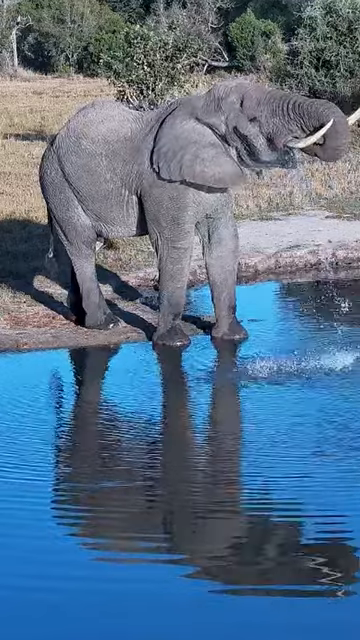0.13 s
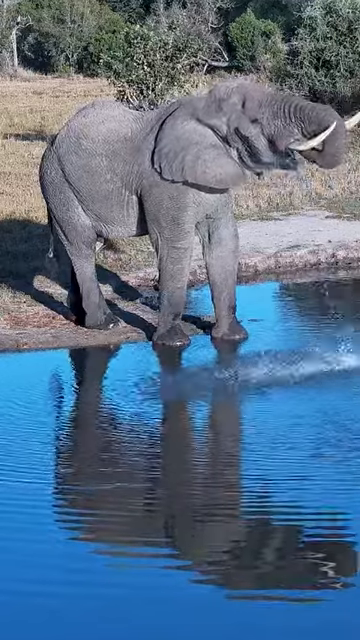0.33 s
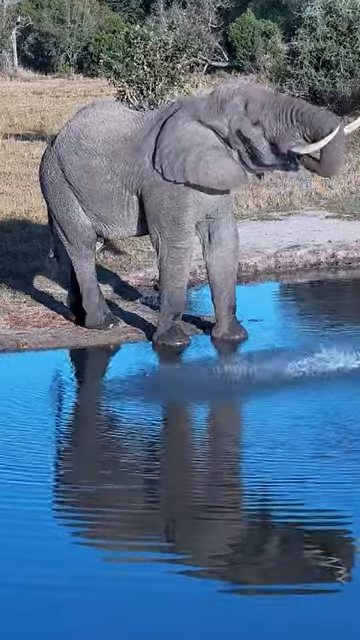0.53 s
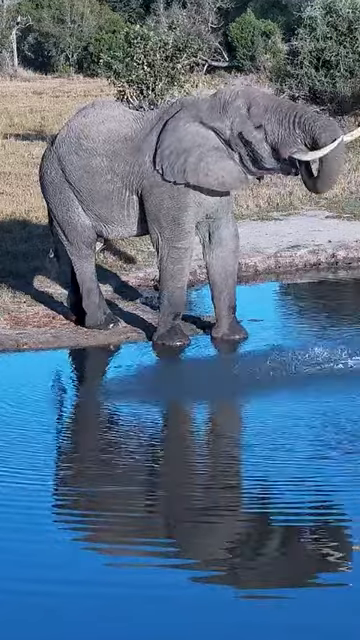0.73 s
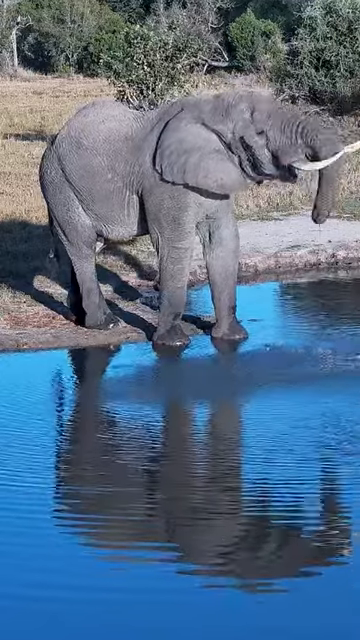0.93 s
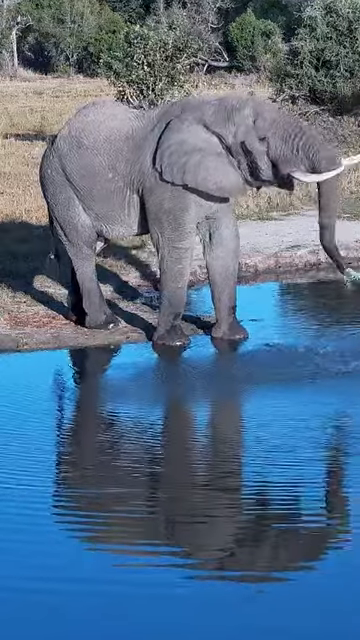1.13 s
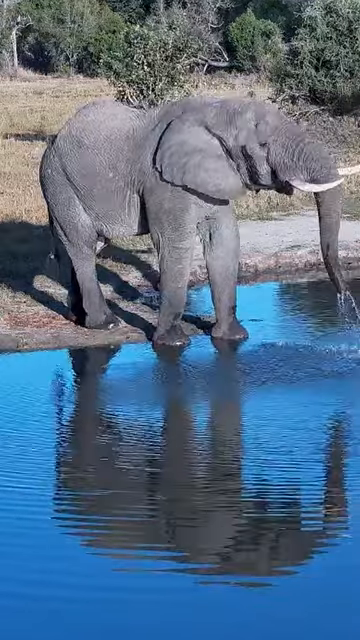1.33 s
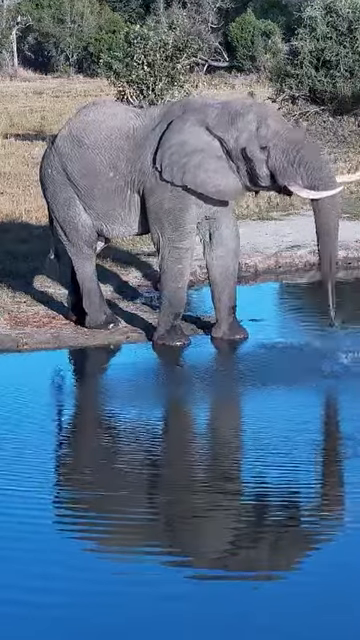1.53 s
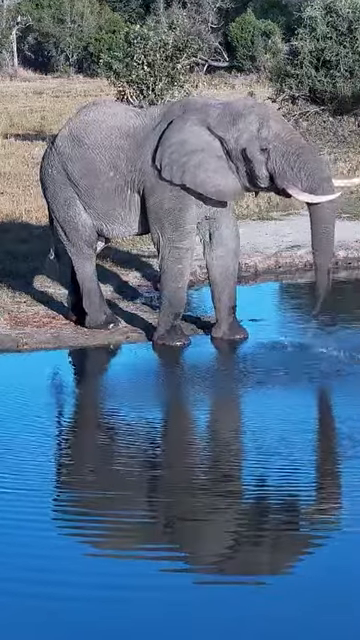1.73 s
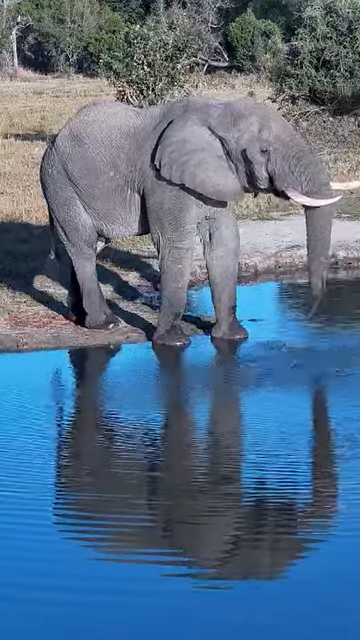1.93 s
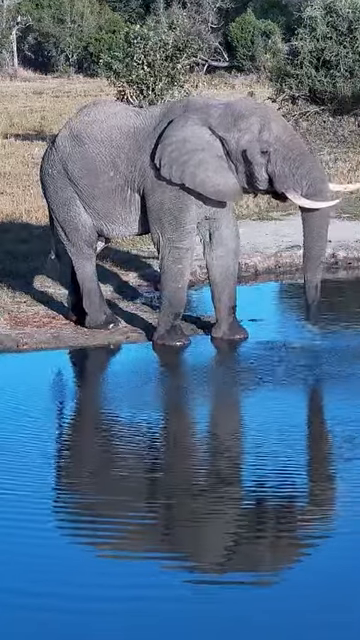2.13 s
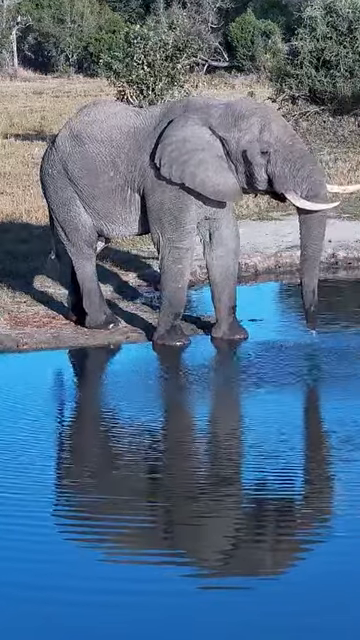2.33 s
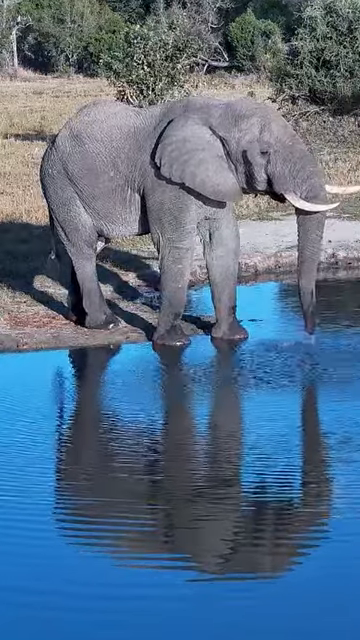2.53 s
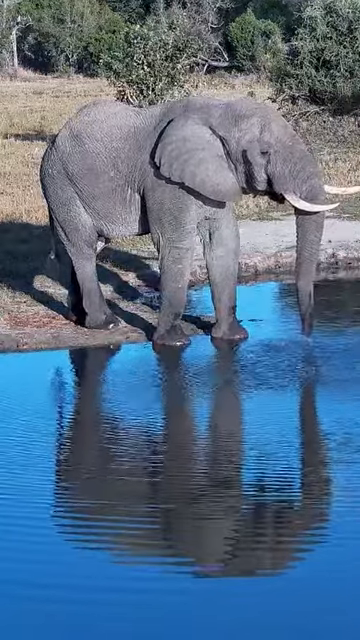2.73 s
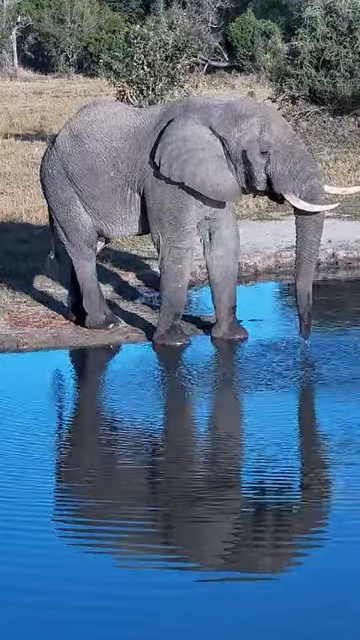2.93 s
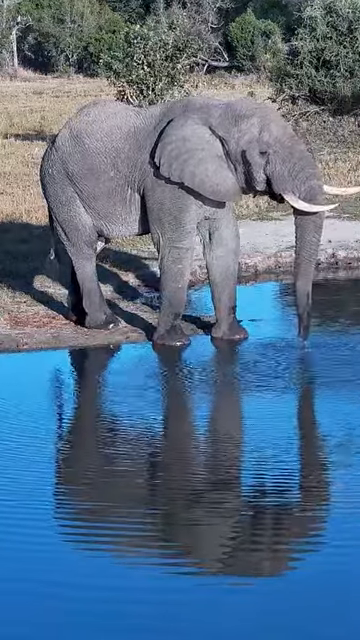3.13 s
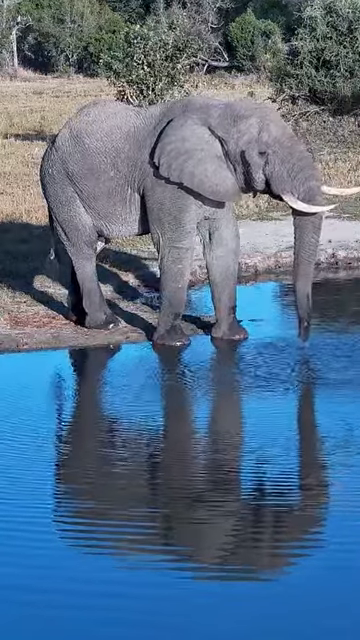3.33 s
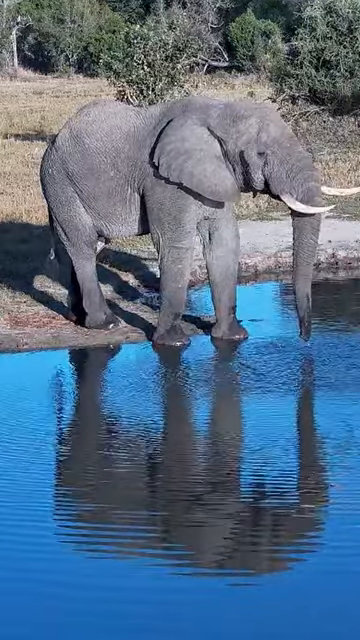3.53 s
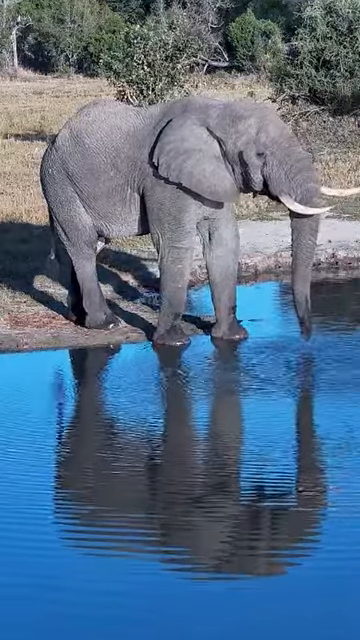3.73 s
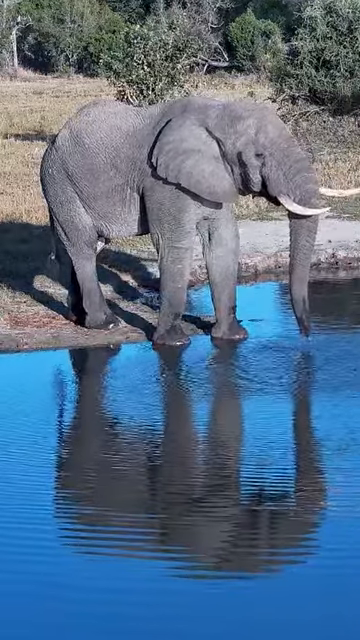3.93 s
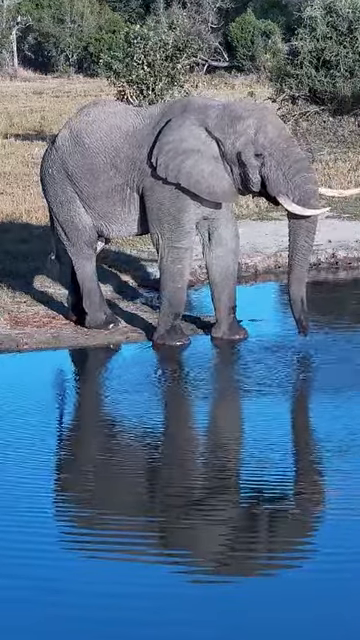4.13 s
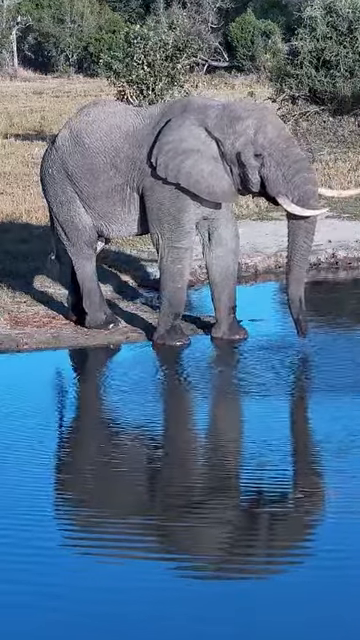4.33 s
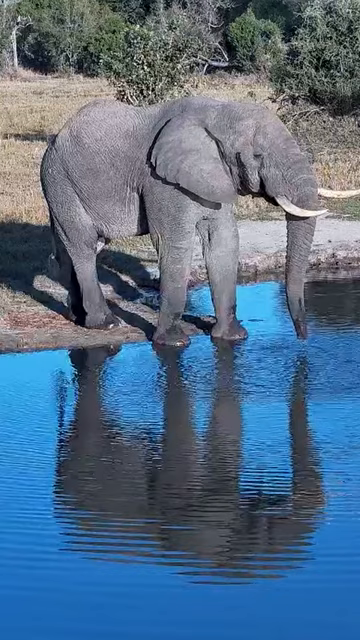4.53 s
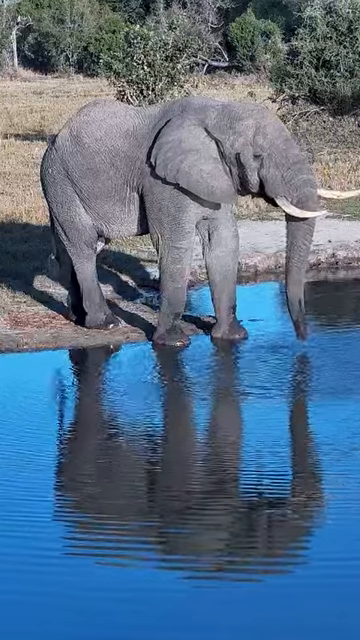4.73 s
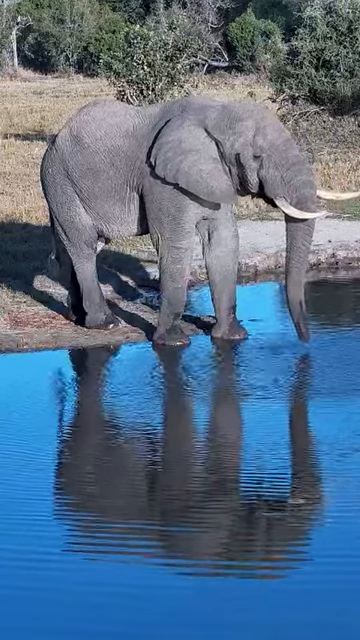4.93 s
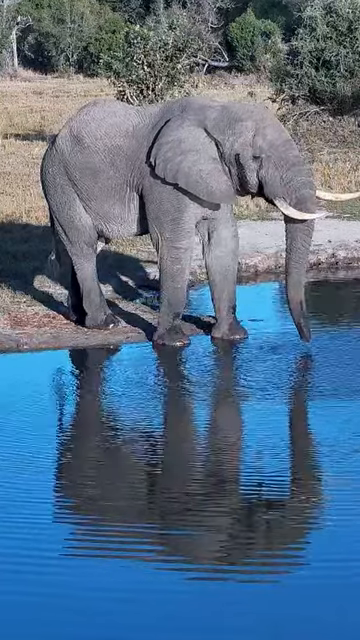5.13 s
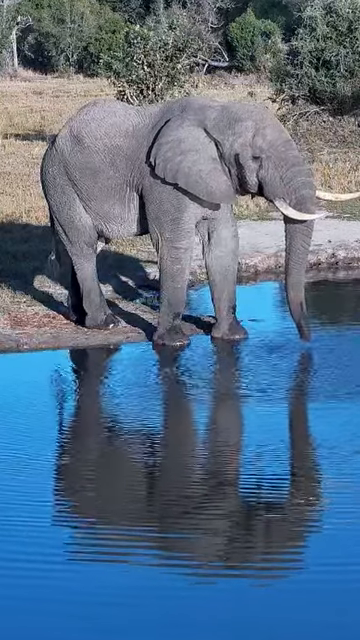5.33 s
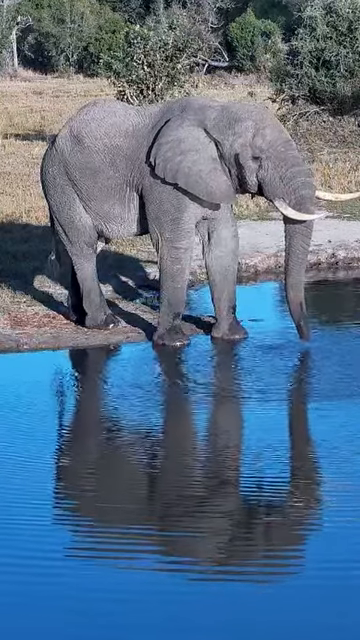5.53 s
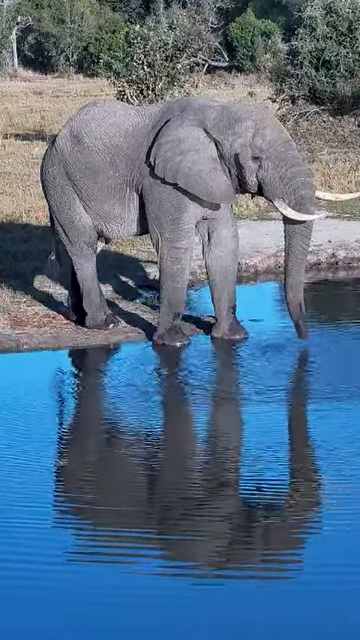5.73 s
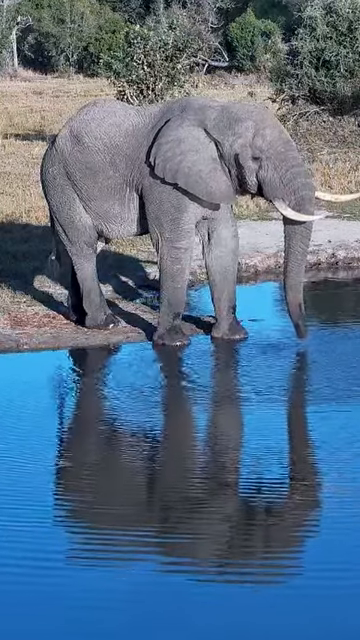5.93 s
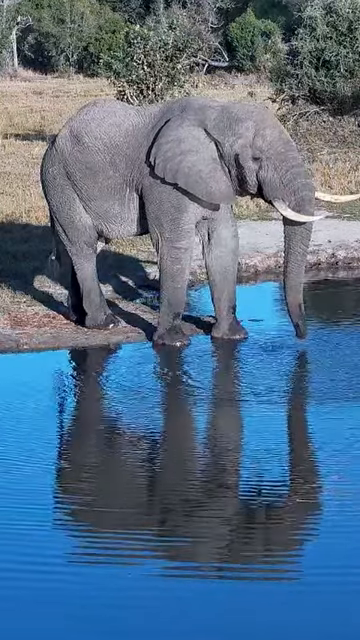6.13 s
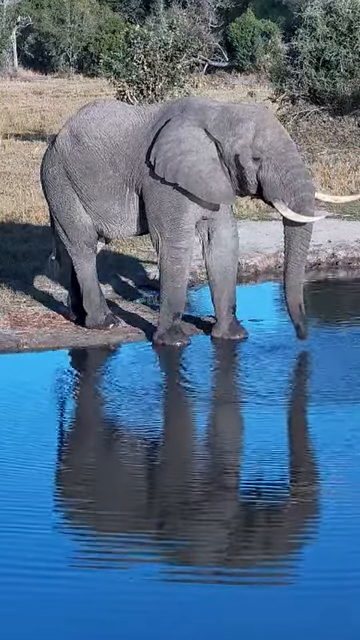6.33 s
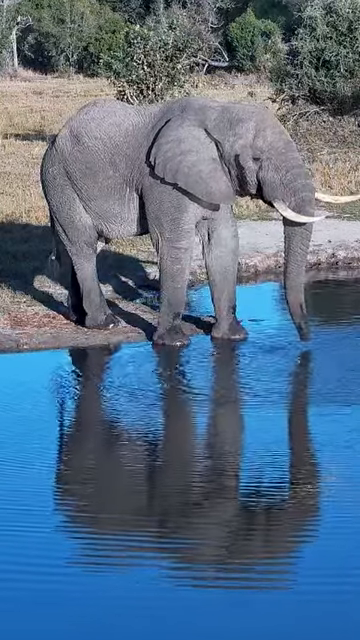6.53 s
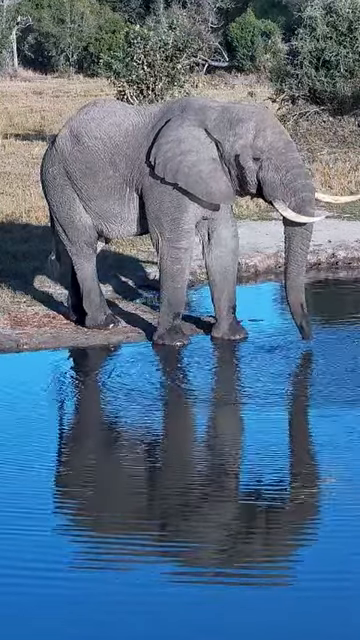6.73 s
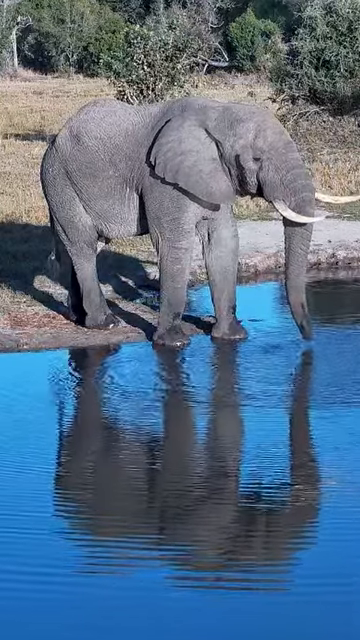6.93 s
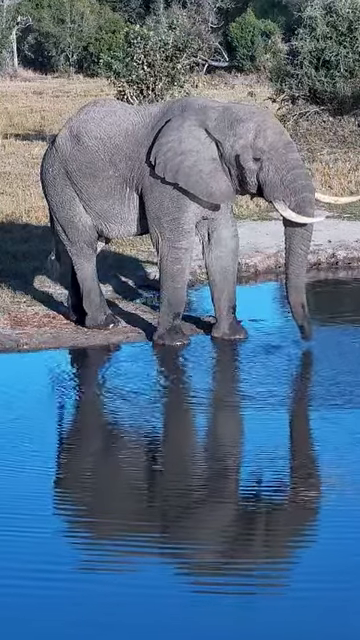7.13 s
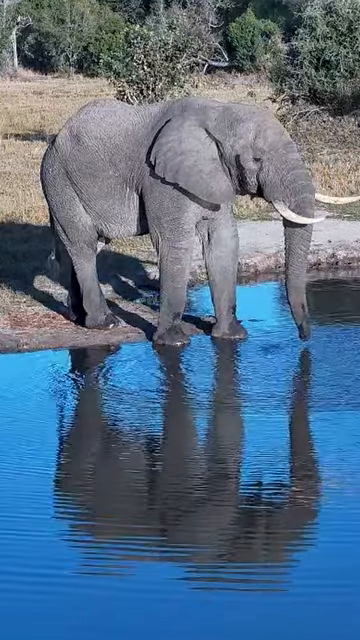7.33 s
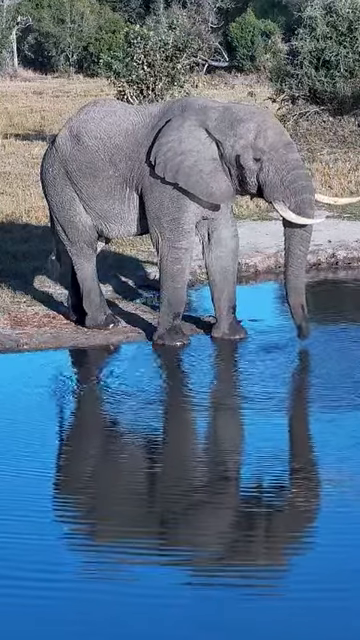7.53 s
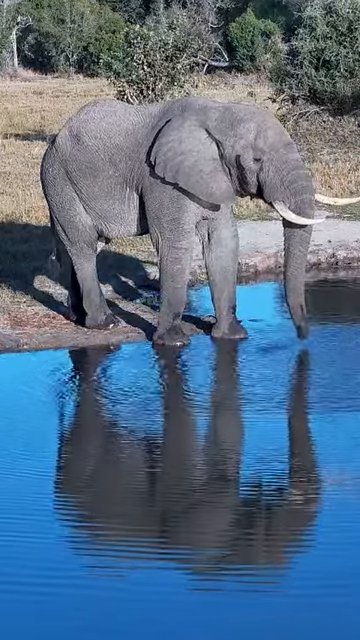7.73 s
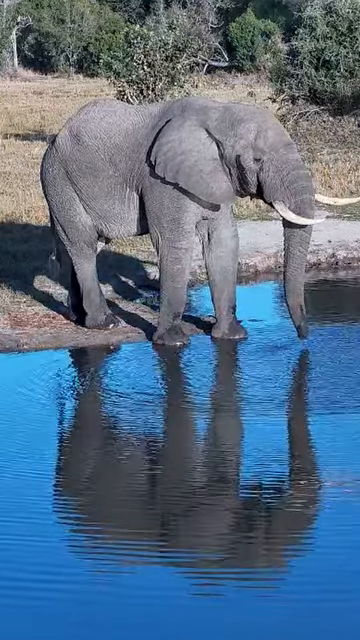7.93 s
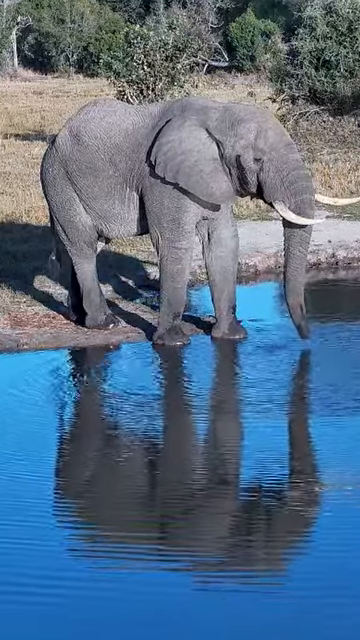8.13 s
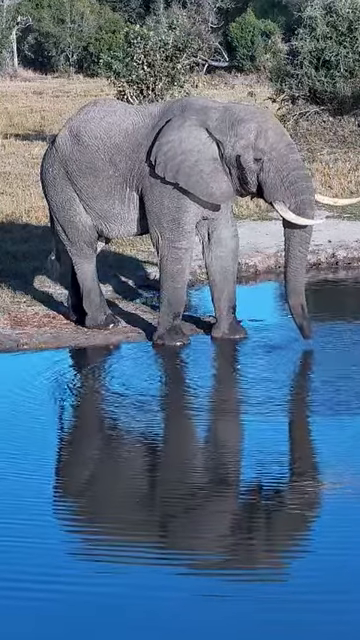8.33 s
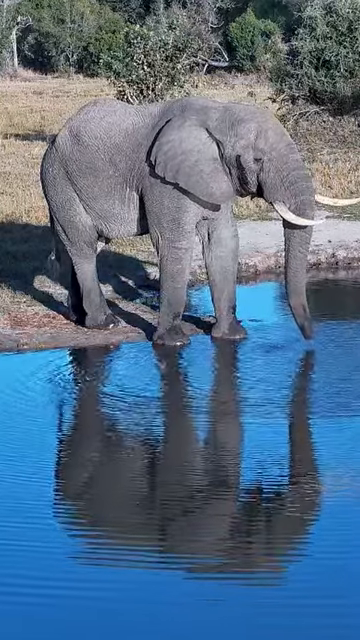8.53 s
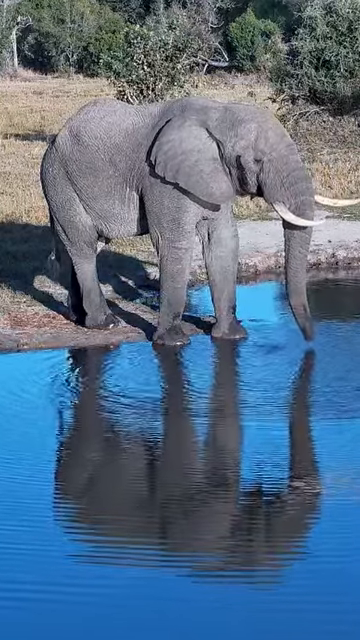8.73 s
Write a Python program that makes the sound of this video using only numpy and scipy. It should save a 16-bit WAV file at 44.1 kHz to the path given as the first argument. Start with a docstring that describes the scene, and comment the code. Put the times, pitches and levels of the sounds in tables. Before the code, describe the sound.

Outdoors at a waterhole, bubbling water opens the scene and breaks into crisp, wet slaps. It quickly dies to scattered plinks, gurgles and a spattering trickle, plus a tiny spray burst. A harsh, whistling bird call comes early over the dripping; a thin stream hisses faintly, then near-quiet settles. A softer raspy bird phrase follows late. Steady soft air rush, clear nearby water, short diffuse echo.

```python
"""An elephant drinks at a waterhole, while faint outdoor air and softly echoing bushes surround it.
First, water pours and slaps onto the pond: clouds of tiny ringing bubbles, hiss and struck cavities.
Then the trunk drips, trickles and glugs, and squirts once: damped tones, rising tones and spray.
A bird calls in two short phrases: harmonic whines, hoarse notes and pulsed rattles, with two whistles
and a dry snap in the first phrase only. Between the phrases, a thin stream hisses for a moment."""
import sys
import numpy as np
from scipy import signal
from scipy.fft import rfft, irfft, next_fast_len
from scipy.io import wavfile
from scipy.ndimage import map_coordinates

SR = 44100
rng = np.random.default_rng(int(sys.argv[2]) if len(sys.argv) > 2 else 0)


def file_out(sig):
    """Save sig as 16-bit WAV at sys.argv[1]."""
    # one column per channel
    cols = np.atleast_2d(sig).T
    # limit, then scale
    lim = np.clip(cols, -1, 1)
    pcm = np.round(lim * 32767).astype(np.int16)
    wavfile.write(sys.argv[1], SR, pcm)


N = 392490  # length in samples


def amp(db):
    """Turn decibels into a plain gain."""
    return 10 ** (np.asarray(db) / 20)


def unit(x):
    """Scale a sound to an rms of 1."""
    return x / np.sqrt(np.mean(x ** 2) + 1e-20)


def along(points, hz):
    """Read a curve of (pitch_hz, value) points, joined by lines on a log pitch axis."""
    point_hz, value = np.transpose(points)
    return np.interp(np.log(hz + 1), np.log(point_hz + 1), value)


def wobble(rate, size):
    """A smooth random curve with `rate` random points a second."""
    points = rng.standard_normal(int(size * rate / SR) + 4)
    return map_coordinates(points, [np.arange(size) * rate / SR])


def swell(start, hold, rise, fall, size=N):
    """A gain that climbs to 1 by `start`, holds, then falls; times in s, slopes in dB per s."""
    t = np.arange(size) / SR - start
    climbing_db = -abs(rise) * np.maximum(-t, 0)
    falling_db = -abs(fall) * np.maximum(t - hold, 0)
    return amp(climbing_db + falling_db)


def glide(t, middle, width):
    """A smooth step from 0 to 1."""
    return .5 + .5 * np.tanh((t - middle) / (2 * width))


def filtered(x, response):
    """Multiply the spectrum of x by a response, given as a function of frequency."""
    padded = next_fast_len(N + SR // 2)
    hz = np.fft.rfftfreq(padded, 1 / SR)
    return irfft(rfft(x, padded) * response(hz), padded)[:N]


def coloured(x, spectrum):
    """Filter x by a table of levels over frequency, then scale it to an rms of 1."""
    return unit(filtered(x, lambda hz: amp(along(spectrum, hz))))


def narrow_noise(centre, width):
    """Noise around one frequency, at rms 1; at the edges of `width` the filter gain is half."""
    noise = rng.standard_normal(N)
    return unit(filtered(noise, lambda hz: 1 / (1 + ((hz - centre) / width * 2) ** 2)))


def add(track, s, sound):
    """Mix a sound into the track at time s."""
    part = track[max(round(s * SR), 0):][:len(sound)]
    part += sound[:len(part)]


def droplets(rate, low_hz, high_hz, cycles, spread_db, hiss):
    """A cloud of tiny damped bubbles of mixed pitch and strength, over the hiss of countless finer ones."""
    when, pitch, size = rng.random((int(rate * N / SR), 3)).T[:, :, None]
    hz = low_hz * (high_hz / low_hz) ** pitch
    k = np.arange(SR // 100)
    turns = hz * k / SR
    # a smaller bubble rings higher and dies sooner
    decay = np.exp(-turns / cycles) * (1 - k / len(k))
    ring = np.sin(2 * np.pi * turns) * decay
    strength = hz * amp(-spread_db * np.log(np.maximum(size, .02)))
    positions = (when * N).astype(int) + k
    cloud = np.bincount(positions.ravel(), (strength * ring).ravel(), N)[:N]
    return unit(cloud) + hiss * rng.standard_normal(N)


def impacts(rows, cycles, splash, splash_t60, width):
    """Each hit rings a short-lived cavity and throws a puff of spray around the same pitch."""
    out, t = np.zeros(N), np.arange(SR // 20) / SR
    f = np.fft.rfftfreq(len(t), 1 / SR)
    for s, db, hz in rows:
        envelope = np.exp(-hz * t / cycles) * (1 - np.exp(-2 * hz * t))
        cavity = np.sin(2 * np.pi * hz * t) * envelope
        band = np.exp(-(np.log2((f + 1) / hz) / width) ** 2)
        spray = unit(irfft(rfft(rng.standard_normal(len(t))) * band, len(t)))
        fading_spray = spray * amp(-60 * t / splash_t60)
        add(out, s, amp(db) * (cavity + splash * fading_spray))
    return out


# tone of the outdoor air: pitch_hz, relative level_db
AIR_TONE = [(25, -6), (60, -7.5), (150, -11.5), (300, -15.5), (430, -14.5), (560, -11), (700, -7),
            (950, -10), (1400, -7.5), (2000, -12), (2700, -14.5), (4400, -15), (12000, -15)]
# narrow humps in the air's rush: centre_hz, width_hz, average rms level_db
AIR_HUMPS = [(600, 224, -66.5), (1172, 49, -65), (1630, 95, -67.5), (3350, 1050, -63)]


def air(floor_db=-54.0, waver_db=1.5):
    """Steady filtered noise makes the outdoor rush, with narrow noise humps that waver in level."""
    out = amp(floor_db) * coloured(rng.standard_normal(N), AIR_TONE)
    for centre, width, db in AIR_HUMPS:
        out += amp(db + waver_db * wobble(3.34, N)) * narrow_noise(centre, width)
    return out


# tone of the bubbles under the pour: pitch_hz, relative level_db
BUBBLING_TONE = [(100, -49), (220, -13.5), (310, -7), (460, -9), (540, -5), (620, 2.5), (690, -2),
                 (770, -11), (860, -3), (1080, -8), (1250, -3.5), (1510, -2.5), (1750, -13), (2500, -15),
                 (4000, -42)]
# tone of spattering water, for the shower and the trickle: pitch_hz, relative level_db
SPATTER_TONE = [(900, -28), (1800, -5), (2650, -13), (3050, -4.5), (3300, 0), (3800, -5), (4200, -12.5),
                (4800, -10.5), (5600, -22.5), (6500, -18.5), (8000, -24.5), (12000, -41)]
# tone of the fine mist: pitch_hz, relative level_db
MIST_TONE = [(2000, -27), (3300, -2), (4700, 1.5), (5700, -5), (6600, -9), (9000, -14.5), (12000, -25)]
# gouts of water hitting the pond, for the shower and the slaps: start_s, length_s, level_db, pitch_hz
WATER_GOUTS = [(0.512, 0.009, -16, 3200), (0.54, 0.0053, -10.5, 3120), (0.593, .006, -14, 3130),
               (0.596, .009, -10.5, 3240), (0.615, .004, -13, 3900), (0.6545, 0.0051, -12, 2800),
               (0.668, 0.014, -15, 3330), (0.737, 0.018, -14, 3150), (0.763, .009, -10.5, 3350),
               (0.7776, .005, -9.5, 3830), (.7934, .009, -14, 3150), (0.882, 0.022, -13.5, 3280),
               (0.984, .005, -19, 3470), (1.116, 0.03, -24.5, 1400)]
# water pouring from the mouth: steady, then it thins out
POUR_END_S, POUR_FALL_DB_PER_S, POUR_BUBBLING_DB, POUR_SPATTER_DB = 0.9, 51.5, -33.5, -39
# the bulk of the spill comes down as one broad splash, at full strength from SPLASH_S
SPLASH_S, SPLASH_HOLD_S, SPLASH_DB = 0.51, 0.5, -34.5
SPLASH_RISE_DB_PER_S, SPLASH_FALL_DB_PER_S = 160, 73
# spatter of each gout; its level is relative to the gout's level_db
GOUT_SPATTER_DB, GOUT_RISE_DB_PER_S, GOUT_FALL_DB_PER_S = -18.5, 2500, 452


def shower(mist_db=-16, clump_db=1.6, clumps_per_s=90):
    """Spilled water churns up bubbles; the pour, the splash and each gout throw spatter and fine mist."""
    pour = swell(0, POUR_END_S, 0, POUR_FALL_DB_PER_S)
    splash = swell(SPLASH_S, SPLASH_HOLD_S, SPLASH_RISE_DB_PER_S, SPLASH_FALL_DB_PER_S)
    clumpy_splash = amp(SPLASH_DB + clump_db * wobble(clumps_per_s, N)) * splash
    flows = [amp(POUR_SPATTER_DB) * pour, clumpy_splash]
    for s, length, db, _ in WATER_GOUTS:
        burst = swell(s, length, GOUT_RISE_DB_PER_S, GOUT_FALL_DB_PER_S)
        flows.append(amp(db + GOUT_SPATTER_DB) * burst)
    spatter_gain = np.linalg.norm(flows, axis=0)  # the flows add in power

    bubbles = droplets(rate=1500, low_hz=300, high_hz=2800, cycles=16, spread_db=1.0, hiss=1.4)
    drops = droplets(rate=1400, low_hz=1770, high_hz=6770, cycles=3.7, spread_db=2.5, hiss=1.0)
    bubbling = coloured(bubbles, BUBBLING_TONE)
    spatter = coloured(drops, SPATTER_TONE)
    mist = coloured(rng.standard_normal(N), MIST_TONE)
    return amp(POUR_BUBBLING_DB) * pour * bubbling + spatter_gain * (spatter + amp(mist_db) * mist)


SLAP_GAP_S = .0062
GOUT_FADE_DB = 11  # drop in slap level over one gout length


def slaps(count=4, uneven=.12, pitch_spread=0.045):
    """Each gout breaks into a quick run of fading slaps, each a struck cavity with spray."""
    rows = []
    for s, length, db, hz in WATER_GOUTS:
        for k, (late, detune) in enumerate(rng.standard_normal((count, 2))):
            # the first slap is always on time
            delay = SLAP_GAP_S * (k + uneven * late * (k > 0))
            level_db = db - GOUT_FADE_DB * (delay / length) ** 2
            rows.append((s + delay, level_db, hz * np.exp(pitch_spread * detune)))
    return impacts(rows, cycles=3.5, splash=0.2, splash_t60=0.016, width=0.83)


# tone of the gurgling run-off: pitch_hz, relative level_db
GURGLE_TONE = [(200, -24), (400, -4.5), (580, -4), (800, 0.5), (980, -3.5), (1220, 3.5), (1420, -1),
               (1620, 2.5), (2000, -10.5), (2600, -7), (4000, -24)]
# dribbles that swell the run-off: peak_time_s, bubbling level_db, spatter level_db
RUNOFF_DRIBBLES = [(1.36, -52, -50), (2.0, -51.5, -46.5), (2.13, -53, -46.5), (2.4, -71, -49),
                   (2.71, -51.5, -47), (3.03, -49, -45), (3.55, -53, -49.5), (3.98, -54, -56.5),
                   (4.42, -55.5, -56)]
DRIBBLE_RISE_DB_PER_S, DRIBBLE_FALL_DB_PER_S = 56, 44
# run-off from trunk and chin: starting levels and how fast each part dries up
RUNOFF_START_S, RUNOFF_END_S = 1.2, 7.74
RUNOFF_BUBBLING_DB, BUBBLING_DRYING_DB_PER_S = -55.5, 1.2
RUNOFF_SPATTER_DB, SPATTER_DRYING_DB_PER_S = -49.5, 2.14


def trickle(onset_db_per_s=200, stop_db_per_s=30):
    """Thin streams of ringing bubbles patter into the pond, swell with each dribble and slowly dry up."""
    running = swell(RUNOFF_START_S, RUNOFF_END_S - RUNOFF_START_S, onset_db_per_s, stop_db_per_s)
    times, bubbling_db, spatter_db = np.transpose(RUNOFF_DRIBBLES)
    surges = np.array([swell(s, 0, DRIBBLE_RISE_DB_PER_S, DRIBBLE_FALL_DB_PER_S) for s in times])

    def flow(start_db, drying, dribble_db):
        """The drying stream and its dribbles add in power."""
        stream = amp(start_db) * running * swell(RUNOFF_START_S, 0, 0, drying)
        return np.sqrt(stream ** 2 + amp(dribble_db) ** 2 @ surges ** 2)

    bubbles = droplets(rate=420, low_hz=454, high_hz=2800, cycles=6.5, spread_db=2.5, hiss=0.93)
    drops = droplets(rate=800, low_hz=2020, high_hz=7030, cycles=7.0, spread_db=2.5, hiss=1.04)
    bubbling = coloured(bubbles, GURGLE_TONE)
    spatter = coloured(drops, SPATTER_TONE)
    bubbling_gain = flow(RUNOFF_BUBBLING_DB, BUBBLING_DRYING_DB_PER_S, bubbling_db)
    spatter_gain = flow(RUNOFF_SPATTER_DB, SPATTER_DRYING_DB_PER_S, spatter_db)
    return bubbling_gain * bubbling + spatter_gain * spatter


# single drops: start_s, level_db, pitch_hz
SINGLE_DROPS = [(1.2341, -26.5, 1610), (1.3467, -28.5, 3430), (1.4082, -31, 2905), (1.4531, -33, 3900),
                (1.582, -32, 3350), (1.6228, -28.5, 3660), (1.941, -25, 3210), (1.9709, -25, 3320),
                (2.1161, -28, 3310), (2.1848, -28, 3150), (2.2313, -32, 3480), (2.6483, -37.5, 1130),
                (3.0046, -26.5, 3350), (3.0114, -29, 3470), (3.043, -30, 1630), (3.059, -31, 3280),
                (3.0762, -30, 1880), (3.239, -33, 3250), (3.5922, -32, 3380), (3.686, -31.5, 1670),
                (3.9403, -32, 1630), (3.9521, -33, 1250), (4.116, -34, 3640), (4.8753, -34, 3350),
                (5.8614, -37.5, 3270), (6.7526, -32.5, 1300), (7.1102, -32.5, 1620)]


def drips():
    """Each drop rings a short-lived cavity in the water and throws a little spray."""
    return impacts(SINGLE_DROPS, cycles=4.6, splash=0.26, splash_t60=0.029, width=0.72)


# large bubbles at the trunk tip: start_s, starting pitch_hz, level_db, life_s
BIG_BUBBLES = [(1.47, 392, -47.5, 0.029), (1.691, 800, -41.5, .034), (2.2, 934, -43.5, 0.026),
               (2.229, 1640, -33, 0.01), (2.672, 676, -39.5, .019), (2.684, 950, -41, 0.02),
               (2.925, 588, -43.5, 0.035), (2.988, 850, -38.5, 0.03), (3.042, 1535, -34.5, 0.028),
               (3.122, 990, -40, .03), (3.682, 1250, -40, .012), (3.939, 1560, -37, 0.0067),
               (3.975, 1050, -46, 0.017), (5.294, 1710, -42, .017), (5.65, 894, -48, 0.021),
               (5.72, 1360, -47, .013), (6.752, 1135, -42, .015), (8.35, 570, -44, 0.011)]


def glugs(rise=24, waver=0.038):
    """A big bubble climbs in pitch as it nears the surface; `rise` is a share of its pitch per second."""
    out = np.zeros(N)
    for s, hz, db, life in BIG_BUBBLES:
        t = np.arange(0, life, 1 / SR)
        pitch = hz * (1 + rise * t + waver * wobble(580, len(t)))
        phase = 2 * np.pi * np.cumsum(pitch) / SR
        envelope = np.sin(np.pi * t / life) * np.exp(-t / life)
        add(out, s, amp(db) * np.sin(phase) * envelope)
    return out


# tone of the trunk's jet: pitch_hz, relative level_db
JET_TONE = [(250, -43), (460, -35), (800, -12.5), (1000, -15), (1250, -5), (1700, -8), (2400, -11.5),
            (3300, 0), (4600, -11), (5700, -20.5), (6700, -18.5), (9000, -23), (12000, -30)]
# the trunk clears itself, at full strength from SQUIRT_S
SQUIRT_S, SQUIRT_HOLD_S, SQUIRT_DB = 1.844, 0.062, -33.7
SQUIRT_RISE_DB_PER_S, SQUIRT_FALL_DB_PER_S = 310, 89


def squirt():
    """A short, dense jet of fine spray leaves the trunk as a cloud of ringing drops and hiss."""
    spray = droplets(rate=1400, low_hz=800, high_hz=7100, cycles=3.9, spread_db=1.2, hiss=1.0)
    burst = swell(SQUIRT_S, SQUIRT_HOLD_S, SQUIRT_RISE_DB_PER_S, SQUIRT_FALL_DB_PER_S)
    return amp(SQUIRT_DB) * burst * coloured(spray, JET_TONE)


def bird_voice(t, hz, gain, throat_hz, skirt_db, rough,
               jitter=0.057, flutter_db=4, rasp=1.0, beak_hz=4600):
    """Six harmonics shaped by one throat resonance; rough notes shake in pitch and level."""
    k = np.arange(1, 7)[:, None]

    def shake(rate):
        """A random wobble as long as the note."""
        return wobble(rate, SR // 4)[:len(t)]

    phase = 2 * np.pi * np.cumsum(hz * (1 + jitter * rough * shake(910))) / SR
    # the beak lets only a trace of treble through, and the fourth harmonic is weak
    beak = 0.078 + 1 / np.sqrt(1 + (k * hz / beak_hz) ** 24)
    octaves_off = np.abs(np.log2(k * hz / throat_hz))
    gains = amp(-skirt_db * octaves_off - 4.1 * (k == 4)) * beak
    # turbulence frays each harmonic on its own
    fray = rasp * rough * np.array([shake(1100) for _ in k])
    harmonics = np.sum(gains * np.sin(k * phase + fray), axis=0)
    voice = np.sqrt(2) * harmonics / np.linalg.norm(gains, axis=0)
    flutter = amp(flutter_db * rough * shake(338))
    return voice * gain * flutter * signal.windows.tukey(len(t), .1)


# nasal whines that sag as the throat closes: start_s, length_s, starting pitch_hz,
# sag (share of pitch), starting level_db, closed throat_hz, throat skirts_db_per_octave
NASAL_WHINES = [(2.222, 0.111, 888, .055, -42.5, 3500, 5.5), (7.403, 0.1, 860, 0.1, -44.5, 1590, 13)]
# times count from the start of each whine
WHINE_SAG_S, WHINE_FADE_DB_PER_S, OPEN_THROAT_HZ, THROAT_CLOSE_S = 0.0395, 65, 4220, 0.019


def bird_whines(rough=.08, sag_width_s=0.0092, close_width_s=0.0044):
    """A whine starts bright and loud, then sags, dulls and fades as its throat resonance drops."""
    out = np.zeros(N)
    for s, length, hz, sag, db, closed_hz, skirt_db in NASAL_WHINES:
        t = np.arange(0, length, 1 / SR)
        pitch = hz * (1 - sag * glide(t, WHINE_SAG_S, sag_width_s))
        closing = glide(t, THROAT_CLOSE_S, close_width_s)
        throat_hz = OPEN_THROAT_HZ * (closed_hz / OPEN_THROAT_HZ) ** closing
        gain = amp(db - WHINE_FADE_DB_PER_S * t)
        add(out, s, bird_voice(t, pitch, gain, throat_hz, skirt_db, rough))
    return out


# hoarse notes: start_s, length_s, pitch_hz, starting level_db, swell_db_per_s, throat_hz,
# throat skirts_db_per_octave, roughness (0-1)
HOARSE_NOTES = [(2.362, 0.054, 1286, -49, -130, 1300, 1, .5), (2.466, 0.082, 1860, -49, 120, 3700, 7, 0.92),
                (2.556, 0.023, 1637, -29, -550, 3400, 26, 0.4),
                (2.712, 0.098, 1846, -43.5, -40, 3600, 4, 1),
                (7.315, 0.037, 1790, -51.5, -100, 3550, 21, .65), (7.524, .105, 1313, -57, 0, 1300, 5, 0.6),
                (7.64, 0.093, 1718, -52.5, 58, 2200, 7, 0.98),
                (7.738, 0.028, 1123, -40.5, -400, 3100, 17, 0.58)]


def bird_rasps():
    """A hoarse note shakes around one pitch while its level swells, fades or holds."""
    out = np.zeros(N)
    for s, length, hz, db, slope, throat_hz, skirt_db, rough in HOARSE_NOTES:
        t = np.arange(0, length, 1 / SR)
        add(out, s, bird_voice(t, hz, amp(db + slope * t), throat_hz, skirt_db, rough))
    return out


# rattles: centre of first pulse_s, pulse count, gap_s, second-harmonic pitch_hz,
# first pulse level_db, change_db per pulse
RATTLE_RUNS = [(2.4775, 6, .0108, 3620, -27, 0.8), (2.557, 2, .004, 3960, -26, -5),
               (2.75, 3, .0047, 3570, -16.5, -1.5), (2.779, 2, .005, 3770, -19, -1),
               (2.7985, 2, .004, 3670, -19.5, -5), (7.688, 3, .0115, 3280, -33, -1)]


def bird_rattle(length=.008, lower_db=-15, jitter=0.068):
    """The voice breaks into runs of brief pulses, strongest on its second harmonic."""
    out, window = np.zeros(N), np.hanning(int(length * SR))
    for s, count, gap, hz, db, step_db in RATTLE_RUNS:
        for k in range(round(count)):
            pitch = hz * (1 + jitter * wobble(1180, len(window)))
            phase = 2 * np.pi * np.cumsum(pitch) / SR
            tone = np.sin(phase) + amp(lower_db) * np.sin(phase / 2)
            add(out, s + k * gap - length / 2, amp(db + k * step_db) * window ** 2 * tone)
    return out


# dry snap at the first whistle: start_s, level_db, pitch_hz
DRY_SNAP = (2.8205, -18.5, 2340)


def bird_snap():
    """A dry snap opens the first whistle: a quickly damped tone with a puff of noise."""
    return impacts([DRY_SNAP], cycles=3.3, splash=0.4, splash_t60=0.022, width=0.88)


# upslurred whistles: start_s, length_s, start pitch_hz, end pitch_hz, slur_time_s (into the note),
# level_db, throat_hz, throat skirts_db_per_octave, starting roughness (0-1)
SLURRED_WHISTLES = [(2.823, .066, 1885, 2223, .034, -27, 3980, 17, 0.65),
                    (3.145, 0.043, 1970, 2215, .006, -38.5, 2200, 13, .15)]
WHISTLE_PEAK_S, SLUR_WIDTH_S = .034, 0.0069  # the peak time counts from the start of the note
WHISTLE_RISE_DB_PER_S, WHISTLE_FALL_DB_PER_S = 160, 600


def bird_whistles(clearing_s=0.038):
    """A whistle swells, slurs upward and loses its roughness on the way."""
    out = np.zeros(N)
    for s, length, start_hz, end_hz, slur, db, throat_hz, skirt_db, rough in SLURRED_WHISTLES:
        t = np.arange(0, length, 1 / SR)
        pitch = start_hz + (end_hz - start_hz) * glide(t, slur, SLUR_WIDTH_S)
        envelope = swell(WHISTLE_PEAK_S, 0, WHISTLE_RISE_DB_PER_S, WHISTLE_FALL_DB_PER_S, size=len(t))
        clearing_rough = rough * np.exp(-(t / clearing_s) ** 2)
        add(out, s, bird_voice(t, pitch, amp(db) * envelope, throat_hz, skirt_db, clearing_rough))
    return out


# a thin stream: full-strength start_s, hold_s, level_db, centre_hz, width_hz
THIN_STREAM_HISS = (4, .5, -58.5, 3750, 500)


def thin_stream(rise_db_per_s=45, fall_db_per_s=12):
    """Tiny, evenly sized bubbles make a narrow hiss, here a band of noise."""
    s, hold, db, centre, width = THIN_STREAM_HISS
    return amp(db) * swell(s, hold, rise_db_per_s, fall_db_per_s) * narrow_noise(centre, width)


def without_bass(x, edge_hz=280, order=2):
    """Small sources radiate almost no bass, so a highpass filter takes it away."""
    return signal.sosfilt(signal.butter(order, edge_hz, "highpass", fs=SR, output="sos"), x)


# echo of the bushes: pitch_hz, time to fall by 60 dB_s
BUSH_ECHO = [(200, 0.18), (2000, 0.14), (10000, 0.047)]


def bushes(x):
    """A diffuse echo, made with a fading noise tail whose treble dies first."""
    hz, t, z = signal.stft(rng.standard_normal(SR // 2), SR, nperseg=256)
    fading = amp(-60 * t / along(BUSH_ECHO, hz)[:, None])
    tail = signal.istft(z * fading, SR, nperseg=256)[1]
    delayed_tail = np.pad(tail, (300, 0))  # delay in samples
    return signal.fftconvolve(x, delayed_tail / np.linalg.norm(tail))[:N]


def scene():
    """Mix the washes of water and air with the sharp sounds and their echo, trimming some levels."""
    wash = air() + shower() + trickle() + squirt() + thin_stream()
    water = amp(-0.7) * slaps() + amp(0.1) * drips() + amp(0.2) * glugs()
    calls = amp(0.5) * (bird_whines() + bird_rasps() + bird_whistles())
    bird = calls + amp(-0.6) * bird_rattle() + bird_snap()
    sharp = without_bass(water + bird)
    return (wash + sharp + amp(-14) * bushes(sharp))[None]


TOP_HZ = 12250


def record(dry):
    """Cut everything from the top frequency upward with a sharp edge."""
    return filtered(dry[0], lambda hz: hz < TOP_HZ)[None]


dry = scene()
out = record(dry)
file_out(out)
```